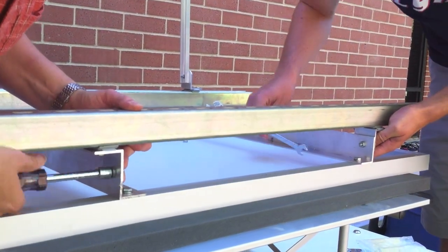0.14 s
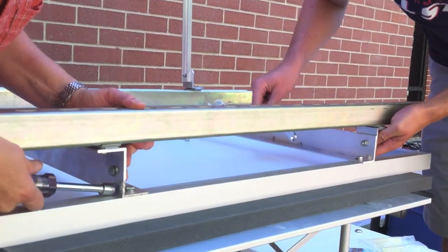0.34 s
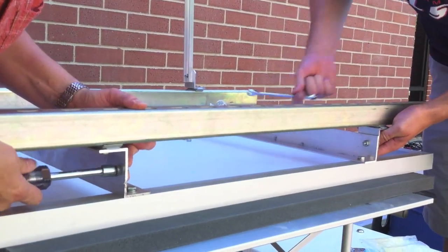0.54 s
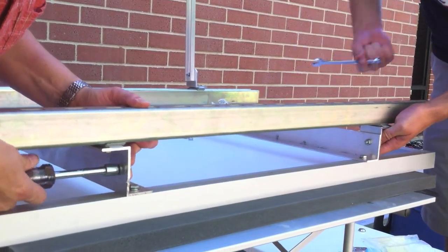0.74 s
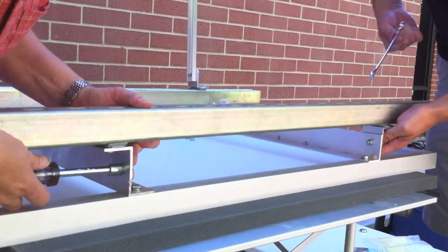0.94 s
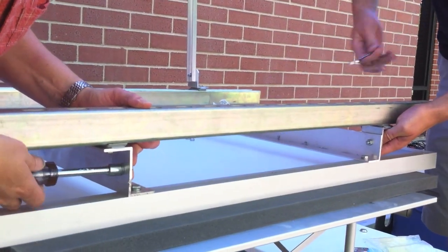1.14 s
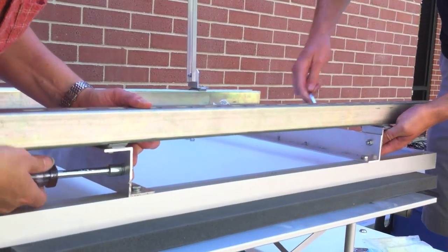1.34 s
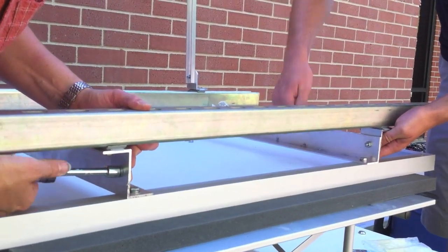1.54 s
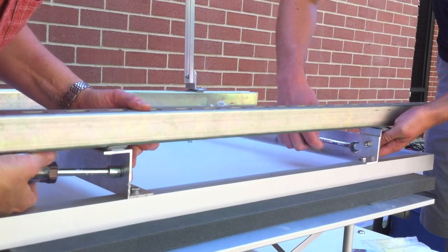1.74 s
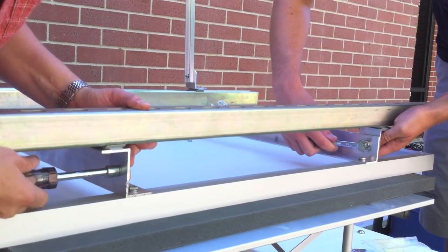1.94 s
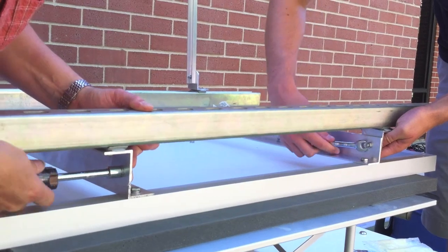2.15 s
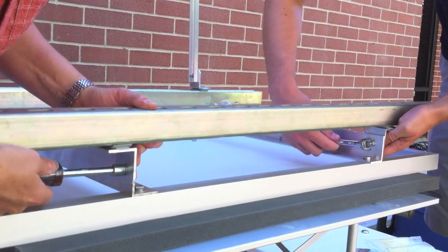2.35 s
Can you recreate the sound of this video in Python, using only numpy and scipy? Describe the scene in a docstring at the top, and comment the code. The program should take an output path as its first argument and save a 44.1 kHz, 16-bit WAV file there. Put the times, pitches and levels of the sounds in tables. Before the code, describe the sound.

Metal tool knocks against an aluminium frame, pause, then rapid wrench clicks on a nut outside

```python
"""Bolting brackets to an aluminium frame

Outdoors beside a brick wall, tools knock on the frame, a wrench slips off a nut, scrapes and clacks
against a bracket; more frame knocks follow, and after a pause the wrench clicks onto a nut.
Each contact is a noisy crack, a mass of short dense modes and a few clear decaying tones; single tones
stand out. One wall slap and a diffuse tail answer, over a low, wavering noise wash of distant traffic."""
import sys
import numpy as np
from scipy import signal
from scipy.fft import rfft, irfft
from scipy.io import wavfile

SR = 44100
rng = np.random.default_rng(int(sys.argv[2]) if len(sys.argv) > 2 else 0)


def materialize(psi):
    """Save the field psi as 16-bit PCM at rate SR to the path in sys.argv[1].

    A 1-D psi becomes a single channel; in a 2-D psi each row is a channel.
    """
    bounded = np.clip(np.atleast_2d(psi).T, -1, 1)
    quanta = np.round(bounded * 32767).astype(np.int16)
    wavfile.write(sys.argv[1], SR, quanta)


N = 110250  # samples, 2.5 s
RING_S = 0.5  # length of each rendered ring and of the yard echo
TOP_HZ = 16000  # upper edge of the sound

# Centres of the low, mid, high and top tone controls of a blow: [f/Hz]
TONE_HZ = (1150, 2400, 5500, 11500)


def bracket():
    """Clacks on the bracket: a stiff plate with bright, quickly damped modes."""
    # Blows: [t/s, level/dB, low/dB, mid/dB, high/dB, top/dB, dense-ring t60/s at the mid tone]
    blows = [(0.3724, 0.5, 2.5, 0.5, 2.5, -0.5, 0.038), (0.4304, -4.5, 4, 0, 3, -1.5, 0.094),
             (0.4480, -19, 3, 4, -11, -1, 0.025)]
    # Clear plate modes: [f/Hz, relative level/dB, t60/s]
    modes = [(877, -39, .07), (1303, -33, .085), (1534, -36, .07), (2148, -29, .07), (2433, -28, .075),
             (2707, -23, .05), (3265, -22.5, .06), (3645, -28, .05), (3932, -23.5, .048), (4780, -29, .055),
             (5778, -26.5, .072), (7120, -32, .045), (8355, -29, .04), (9545, -29, .04)]
    # Spectrum of the crack and dense modes: [f/Hz, level/dB]
    body = [(300, -21), (520, -9.5), (700, 6.5), (870, 4.5), (1450, 5), (2100, 17.5), (2600, 14), (2920, 4),
            (3150, 21.5), (3600, 17), (4300, -3), (5100, 11), (5450, -1.5), (6100, 6), (6700, 5),
            (8600, 7.5), (10600, 12), (11800, 3.5), (16000, -2)]
    return strikes(blows, modes, body, modes_db=3.5, crack_db=-8.5)


def frame():
    """Tools knock on the aluminium frame, whose clear modes ring longer."""
    # Knocks: [t/s, level/dB, low/dB, mid/dB, high/dB, top/dB, dense-ring t60/s at the mid tone]
    knocks = [(0.0900, -18, 3.5, -1.7, -2, -7, 0.19), (0.1735, -29, -4, 2, 11.5, -6, 0.055),
              (0.5367, -0.5, 2.5, 1.2, 0, 8, 0.077), (0.5550, -6, -12, -2.5, 11, -5.5, 0.12),
              (0.6828, -1.5, 0, -0.65, 5.5, 1.5, 0.11), (0.6980, -9.5, -1, -0.28, 5.5, 1, 0.05),
              (0.9930, -22, 1.5, 1, 5.5, -12, 0.077), (1.0140, -3.5, 2, -3.4, 4, -3.5, 0.093),
              (1.0720, -24.5, 0, -0.66, 2, -8, 0.073), (1.3533, -32.5, -1, -1, 1.5, -13, 0.09)]
    # Clear frame modes: [f/Hz, relative level/dB, t60/s]
    modes = [(640, -46, .1), (1293, -43, .1), (1930, -41, .13), (2060, -37, .16), (2285, -33, .13),
             (2740, -40, .1), (3745, -44, .13), (4188, -45, .13), (5765, -45, .11), (5911, -43, .09),
             (6850, -46, .09)]
    # Spectrum of the crack and dense modes: [f/Hz, level/dB]
    body = [(300, -15), (500, -8.5), (640, -1.5), (870, 7), (1020, 6), (1450, 6.5), (2100, 15), (2700, 7),
            (3300, 3), (6200, -1), (7500, -4), (10500, -3), (16000, -14)]
    return strikes(knocks, modes, body, modes_db=5.0, crack_db=-11.5)


def nut():
    """The wrench clicks on the nut: contacts with short metallic modes."""
    # Clicks: [t/s, level/dB, low/dB, mid/dB, high/dB, top/dB, dense-ring t60/s at the mid tone]
    clicks = [(0.2414, 3.5, -3.5, 3.5, -12.5, 8, 0.054), (1.9090, -16.5, 6, 4, -6, -11, 0.22),
              (1.9650, -4, -2, 2.5, -2, -11, 0.073), (2.0448, 0.5, 0.5, -2.5, 3, 7.5, 0.069),
              (2.0570, -5, 4, 4.5, -1, -6, 0.14), (2.1040, -8, 4.5, 2.5, 3, 2, 0.11),
              (2.1500, -3.5, -9, 2.5, 3.5, 3.5, 0.075), (2.1790, -7, 1, 1, -4.5, -1, 0.092),
              (2.2269, 1, -11, -1, 3, 4, 0.089), (2.3476, -3.5, -2.5, 3, -2.5, -6, 0.055),
              (2.4174, -6.5, 1.5, -4, 3.5, -7.5, 0.042), (2.4489, -10.5, 3, 1.5, -9, -6, 0.072)]
    # Clear nut and wrench modes: [f/Hz, relative level/dB, t60/s]
    modes = [(1290, -47, .07), (2060, -48, .08), (2422, -44, .11), (2650, -43, .08), (2820, -42, .07),
             (3035, -48, .11), (4110, -42, .07), (4660, -44, .08), (5370, -40, .07), (5790, -39, .05),
             (6100, -38, .06), (6720, -45, .06), (10400, -44, .04)]
    # Spectrum of the crack and dense modes: [f/Hz, level/dB]
    body = [(150, -30), (700, -5), (1200, 2), (1900, -1), (2700, 0), (3500, -4), (4600, -4.5), (5900, 0),
            (8400, -9.5), (10500, -7), (12000, -14.5), (16000, -20)]
    return strikes(clicks, modes, body, modes_db=2.5, crack_db=-12)


def strikes(blows, modes, body, modes_db, crack_db):
    """Metal meets metal: a crack, dense modes of uneven strength and clear ones, toned by the landing."""
    out = np.zeros(N)
    t = np.arange(int(RING_S * SR)) / SR
    uneven = ripple(step_hz=110, depth_db=2.0)  # belongs to the part, same for all its blows
    for start, db, low, mid, high, top, t60 in blows:
        crack = undb(crack_db) * contact(t)
        sound = colour(dense_ring(t, t60) + crack, body)
        sound = colour(sound, uneven)
        grip = ripple(step_hz=330, depth_db=2.5)  # each landing favours other bands
        sound = colour(sound, grip)
        polarities = np.sign(rng.standard_normal(len(modes)))
        for (hz, mode_db, mode_t60), polarity in zip(modes, polarities):
            sound += polarity * undb(modes_db + mode_db) * ring(t, hz, mode_t60)
        tone = list(zip(TONE_HZ, (low, mid, high, top)))
        add(out, start, undb(db) * colour(sound, tone))
    return out


def contact(t, count=3):
    """A first crack and shorter skips of random strength as the tool chatters, unit energy."""
    crack_s = 0.002  # decay time constant of the first push
    chatter_s, chatter_db = 0.014, -0.5  # span of the skips after landing, and their level
    push = np.exp(-t / crack_s)
    for when, size in rng.random((count, 2)):
        skip = 2 * size * undb(chatter_db) * np.exp(-2 * t / crack_s)
        add(push, when * chatter_s, skip)
    return unit(rng.standard_normal(len(t)) * push) / np.sqrt(len(t))


def dense_ring(t, t60):
    """Crowded modes as decaying noise bands, near-flat with about unit energy; the treble dies first."""
    damping = 0.35  # t60 falls as frequency ** -damping
    rise = 1 - np.exp(-t / 0.0005)
    noise = rfft(rng.standard_normal(len(t)))
    f = np.fft.rfftfreq(len(t), 1 / SR)
    edges = np.geomspace(200, 20000, 21)  # about a third of an octave each
    out = 0
    for lo, hi in zip(edges, edges[1:]):
        band = irfft(noise * ((f >= lo) & (f < hi)), len(t))
        band_t60 = t60 * (lo / TONE_HZ[1]) ** -damping
        band = band * fade(t, band_t60) * rise
        out = out + unit(band) * np.sqrt(2 * (hi - lo) / SR / len(t))
    return out


def ring(t, hz, t60):
    """One mode that builds up and decays, shaken randomly in strength and phase."""
    rattle_share, rattle_hz = 0.3, 130  # depth of the shake, and new random values per second
    knots = np.arange(0, RING_S, 1 / rattle_hz)
    real, imag = rng.standard_normal((2, len(knots)))
    shake = 1 + rattle_share * np.interp(t, knots, real + 1j * imag)
    tone = np.imag(shake * np.exp(2j * np.pi * hz * t))
    return tone * fade(t, t60) * (1 - np.exp(-t / 0.0012))


def single_tones():
    """Single decaying tones that stand out: pings of blows, a low thud, a squeal in the scrape, longer rings."""
    # Tones: [t/s, f/Hz, level/dB, t60/s]
    tones = [(0.2414, 2750, -26, .034), (0.2414, 8420, -29, .035), (0.293, 3250, -39, .11),
             (0.442, 900, -27, .04), (0.5367, 6444, -44, .26), (0.6833, 4650, -41, .1),
             (1.0156, 2960, -51, .35), (1.0156, 2310, -29, .065), (1.0156, 1290, -33, .05),
             (2.15, 4107, -38, .055), (2.2269, 1135, -28.5, .065), (2.2269, 1292, -27, .07),
             (2.2269, 5270, -33, .065), (2.3476, 2826, -33, .065), (2.3476, 3052, -36, .065),
             (2.4174, 5766, -35, .032)]
    out = np.zeros(N)
    t = np.arange(int(RING_S * SR)) / SR
    for start, hz, db, t60 in tones:
        add(out, start, undb(db) * ring(t, hz, t60))
    return out


def scrape():
    """The wrench slides along the bolt: tiny slips of steel on steel merge into a short rasp."""
    # Loudness of the slide: [t/s, level/dB]
    slide = [(0.25, -53), (0.265, -46), (0.283, -49), (0.299, -44), (0.311, -51), (0.335, -68)]
    # Spectrum of the rasp: [f/Hz, level/dB]
    body = [(500, -6.5), (2200, -2), (3200, 8), (4200, -14), (5800, 0.5), (6600, -4), (7200, 4), (8800, -7),
            (13300, -6), (16000, -18)]
    slips_per_s = 1500
    slips = (rng.random(N) < slips_per_s / SR) * rng.standard_normal(N)
    grain = dense_ring(np.arange(SR // 10) / SR, t60=0.048)
    rasp = signal.fftconvolve(slips, grain)[:N]
    times, db = np.array(slide).T
    level = np.interp(np.arange(N) / SR, times, undb(db), left=0, right=0)
    return unit(colour(rasp, body)) * level


def yard(x):
    """One slap from the brick wall and a short diffuse tail, by convolution with an echo pattern."""
    # Tone of the echoes: [f/Hz, level/dB]
    tone = [(300, -1), (2500, 0), (6000, -4.5), (9000, -9), (16000, -5.5)]
    wall_s, wall_db = 0.017, -15  # slap delay and level
    tail_t60_s, tail_db, gap_s = 0.27, -18, 0.004  # the tail swells in over the gap
    t = np.arange(int(RING_S * SR)) / SR
    swell = 1 - np.exp(-(t / gap_s) ** 2)
    tail = rng.standard_normal(len(t)) * fade(t, tail_t60_s) * swell
    echo = undb(tail_db) * unit(tail) / np.sqrt(len(t))
    add(echo, wall_s, undb([wall_db]))
    return signal.fftconvolve(x, colour(echo, tone))[:N]


def rumble():
    """Distant traffic: a low, slightly wavering wash of shaped noise with faint hiss."""
    # Spectral shape of the wash: [f/Hz, relative density/dB per Hz]
    shape = [(15, -83), (25, -52.5), (84, -17), (114, -2.5), (212, -1), (256, -5), (503, -15), (695, -12.5),
             (1070, -17.5), (3430, -38), (16000, -50)]
    level_db, waver_db = -46, 0.7
    hz, db = np.array(shape, float).T
    f = np.fft.rfftfreq(N, 1 / SR)
    gain = undb(np.interp(np.log(f + 1), np.log(hz), db))
    wash = unit(irfft(rfft(rng.standard_normal(N)) * gain, N))
    # 20 random levels joined by straight lines
    waver = np.interp(np.linspace(0, 1, N), np.linspace(0, 1, 20), rng.standard_normal(20))
    return wash * undb(level_db + waver_db * waver)


def ripple(step_hz, depth_db):
    """Random peaks and deeper troughs as (Hz, dB) points."""
    steps = np.arange(step_hz, TOP_HZ, step_hz)
    return list(zip(steps, depth_db * np.clip(rng.standard_normal(len(steps)), -2, 1)))


def colour(x, points):
    """Causal minimum-phase filter that follows (Hz, dB) points."""
    size = 4096
    hz, db = np.array(points, float).T
    f = np.fft.rfftfreq(size, 1 / SR)
    log_gain = np.log(undb(np.interp(np.log(f + 1), np.log(hz), db)))
    # folding the cepstrum onto positive times makes the filter causal
    cepstrum = irfft(log_gain)
    cepstrum[1:size // 2] *= 2
    cepstrum[size // 2 + 1:] = 0
    impulse = irfft(np.exp(rfft(cepstrum)))
    return signal.fftconvolve(x, impulse)[:len(x)]


def fade(t, t60):
    """Exponential decay, 60 dB down at t60."""
    return np.exp(-np.log(1000) * t / max(t60, 1e-3))


def undb(db):
    """Decibels to gain."""
    return 10 ** (np.asarray(db) / 20)


def unit(x):
    """Scale to rms 1."""
    return x / np.sqrt(np.mean(x ** 2) + 1e-20)


def add(out, start_s, sound):
    """Mix a sound in at a time."""
    i = max(int(start_s * SR), 0)
    out[i:i + len(sound)] += sound[:len(out) - i]


def scene():
    """Tools on bracket, frame and nut, with the yard around them."""
    tools = bracket() + frame() + nut() + single_tones() + scrape()
    return (tools + yard(tools) + rumble())[None]


def record(dry):
    """The recorder cuts the top with a steep elliptic low-pass."""
    low_pass = signal.ellip(8, 0.2, 70, TOP_HZ, fs=SR, output="sos")
    return signal.sosfilt(low_pass, dry)


dry = scene()
out = record(dry)
materialize(out)
```